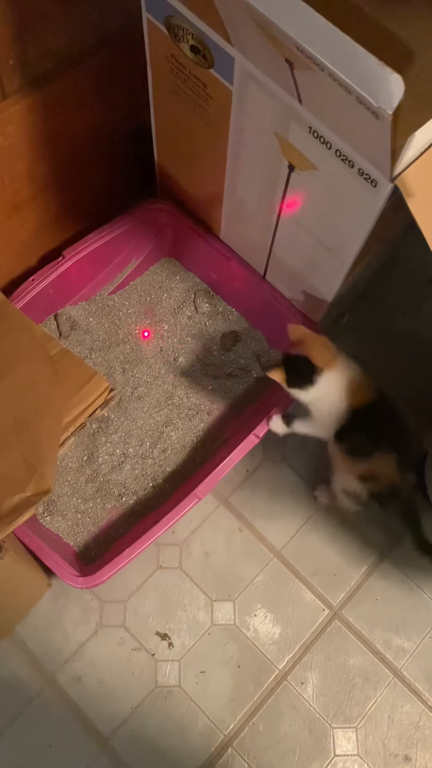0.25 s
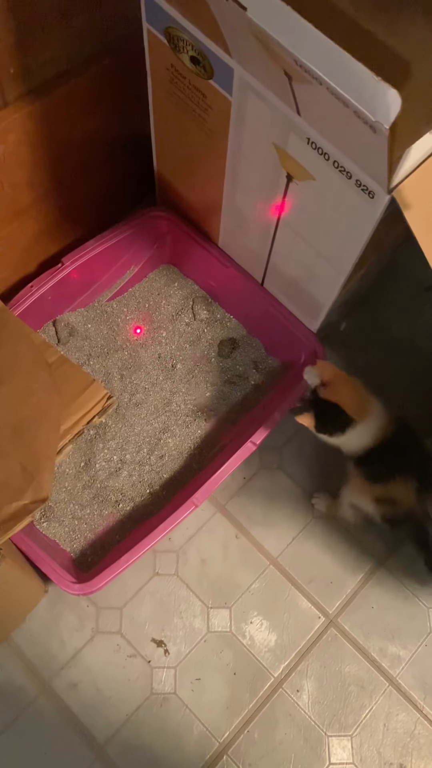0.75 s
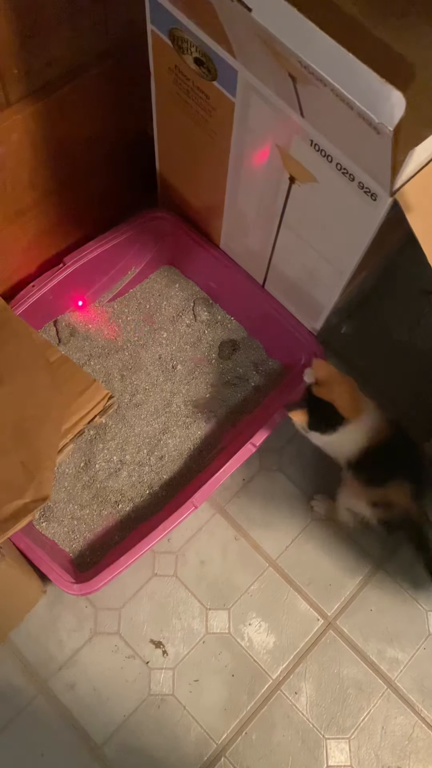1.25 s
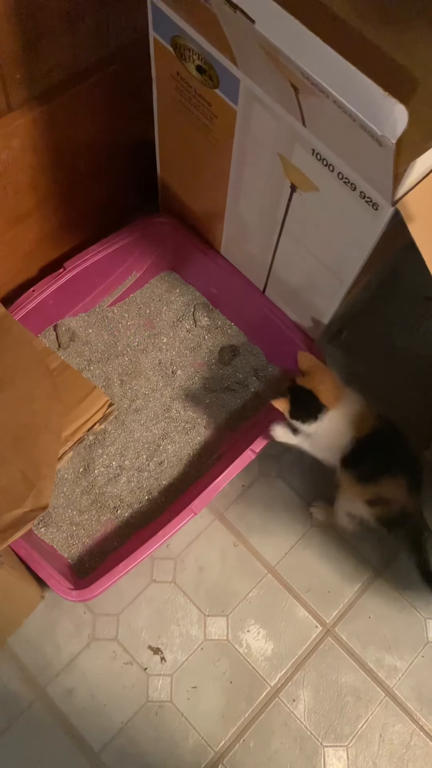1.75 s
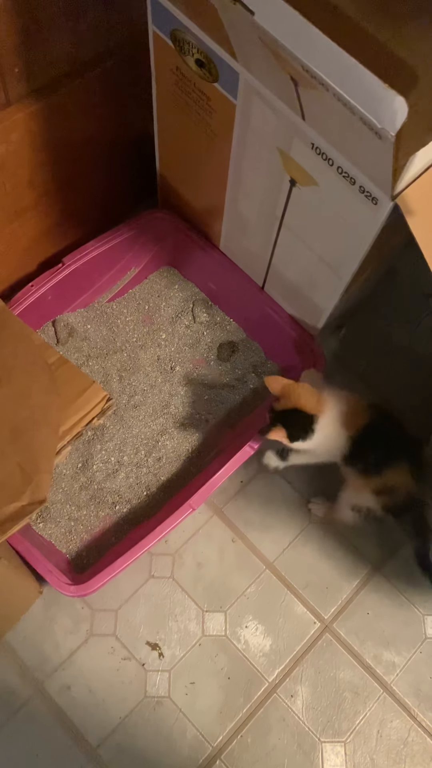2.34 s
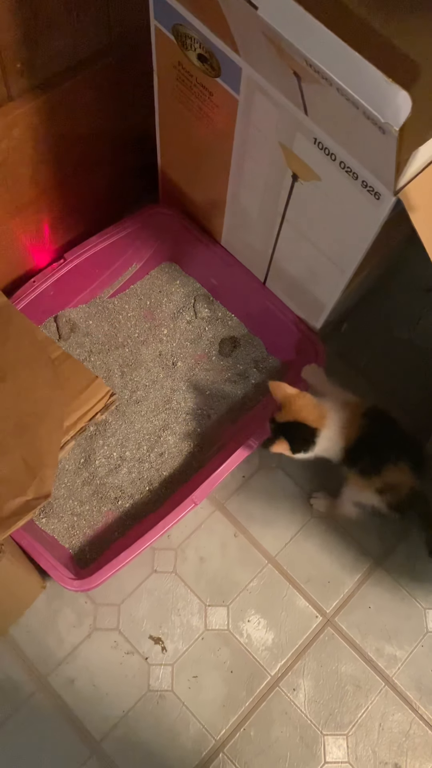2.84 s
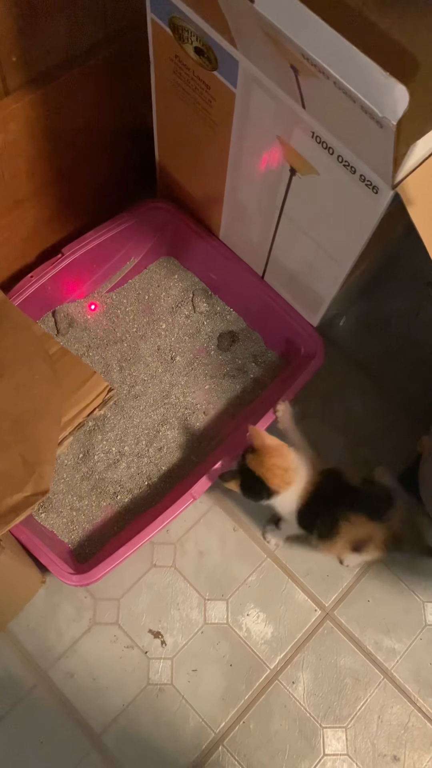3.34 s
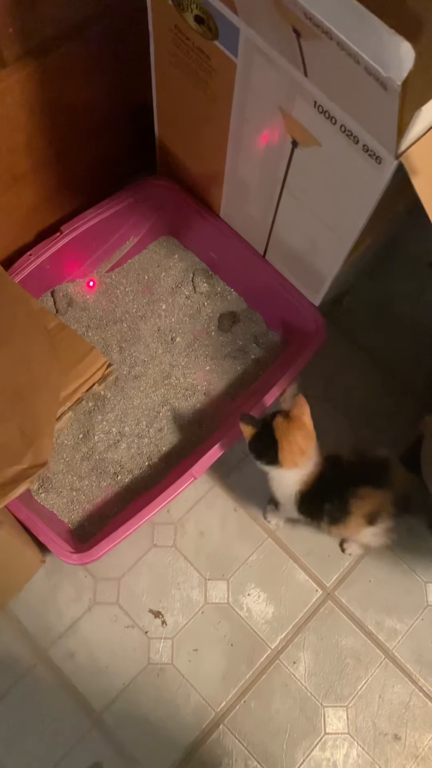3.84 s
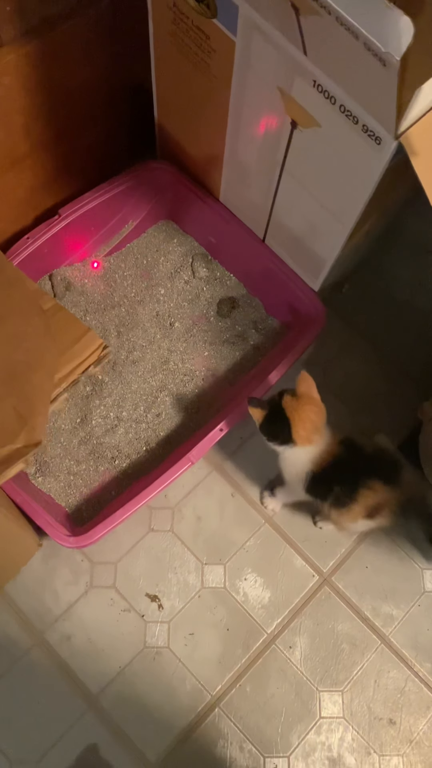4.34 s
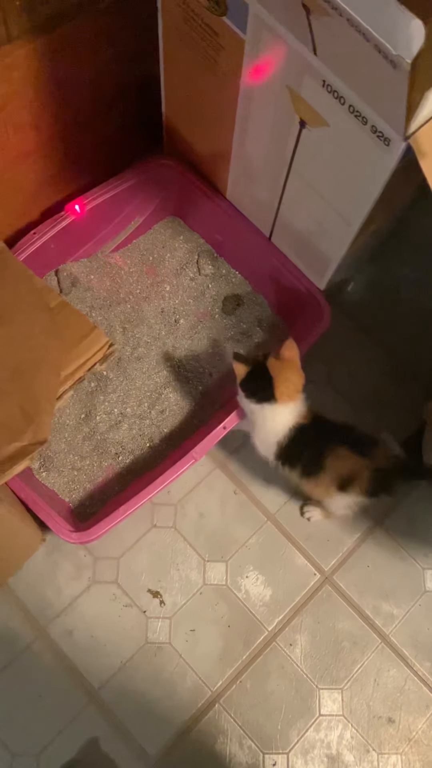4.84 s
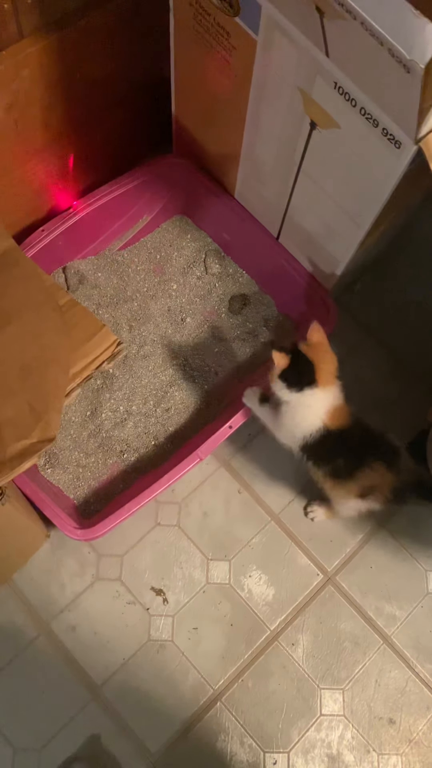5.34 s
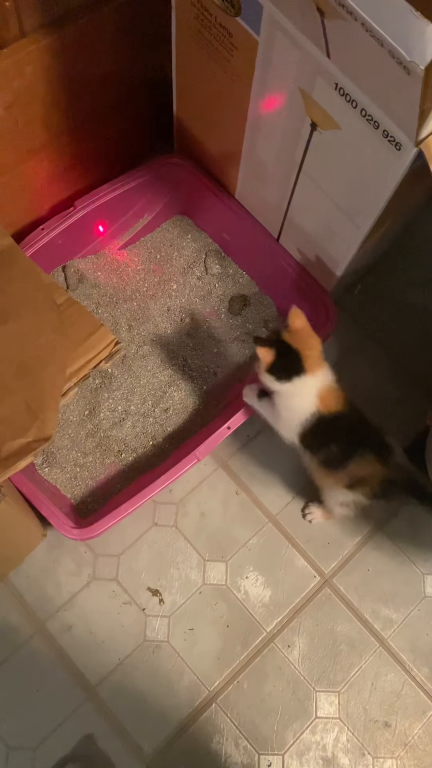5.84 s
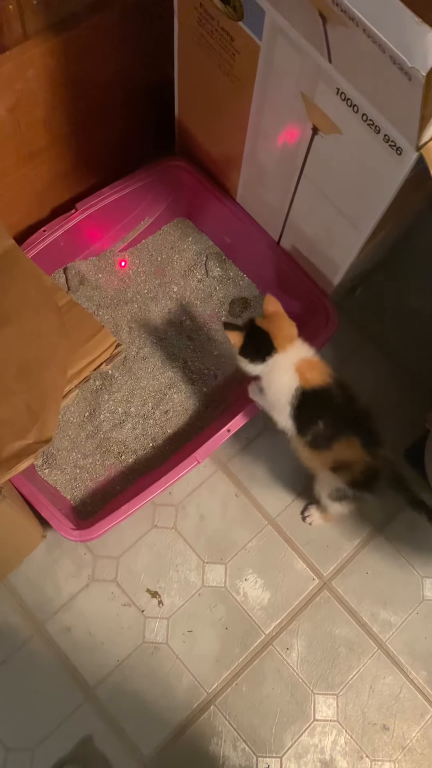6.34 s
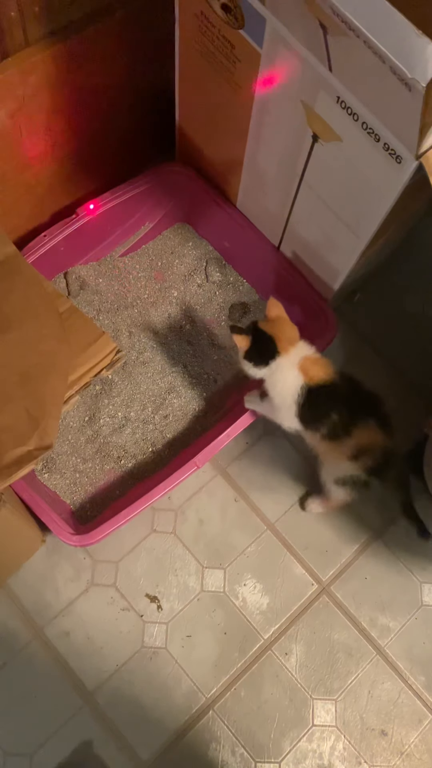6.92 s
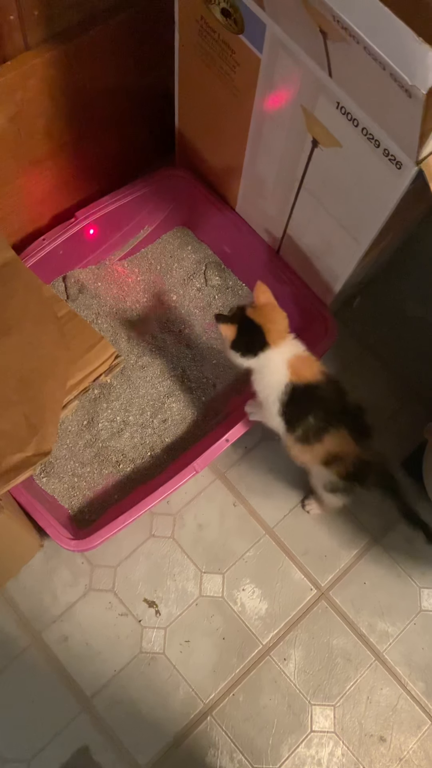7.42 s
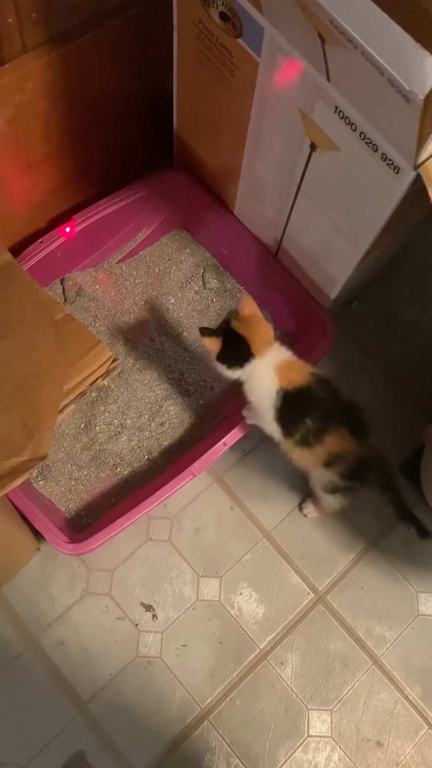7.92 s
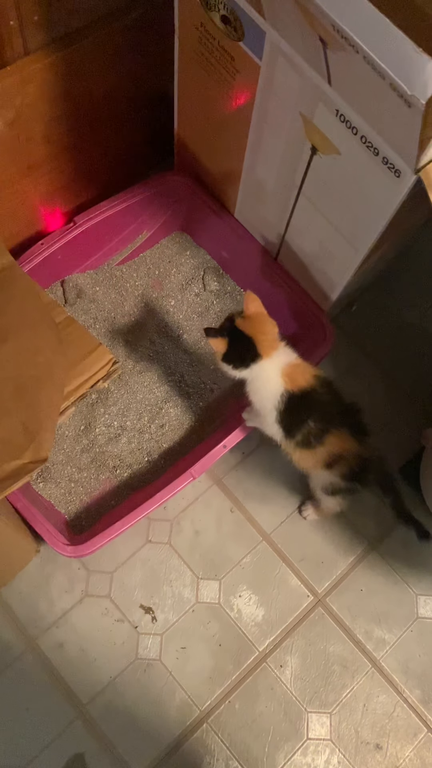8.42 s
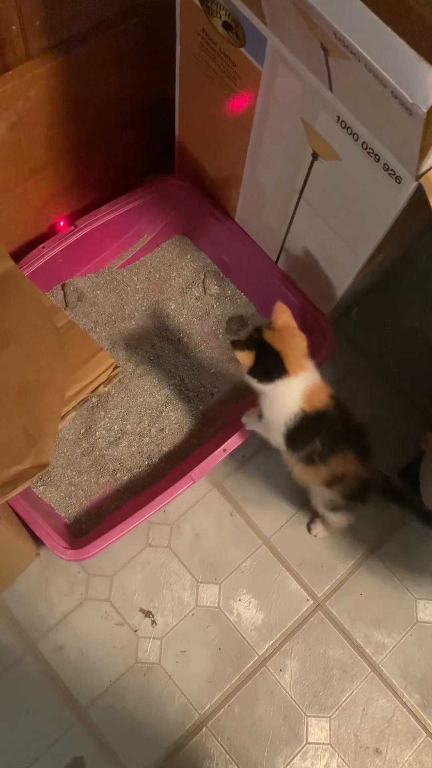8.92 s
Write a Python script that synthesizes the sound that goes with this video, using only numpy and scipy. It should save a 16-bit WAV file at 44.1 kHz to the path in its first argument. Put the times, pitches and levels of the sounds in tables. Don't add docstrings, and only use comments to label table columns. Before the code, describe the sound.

Close phone pickup of a kitten beside a litter tray on a hard floor. Light claw ticks and soft fur brushing come between short pounces that knock the plastic rim, thump softly and scatter clay grains. The heaviest landing comes about halfway, then activity nearly stops. Short room reflections follow each hit, while a low appliance drone with faint whine and a distant, dim clock tick continues underneath.

```python
import sys
import numpy as np
from scipy import signal
from scipy.fft import rfft, irfft, next_fast_len
from scipy.io import wavfile
from scipy.ndimage import uniform_filter1d

SR = 44100
rng = np.random.default_rng(int(sys.argv[2]) if len(sys.argv) > 2 else 0)


def master(y):
    cut = np.clip(np.atleast_2d(y).T, -1, 1)
    pcm = np.round(cut * 32767)
    wavfile.write(sys.argv[1], SR, pcm.astype(np.int16))


def makeup_ratio(level_db):
    decades = np.asarray(level_db, float) / 20
    return 10 ** decades


N = 403956
M = next_fast_len(N)
T = np.arange(N) / SR
HZ = np.maximum(np.arange(M // 2 + 1) * SR / M, 1)

# f/Hz, rms level/dB, wobble/dB
HUM = [(58.7, -52, .5), (67.8, -63, 1.0), (120, -57, .6), (155.3, -72, 1.1), (176.1, -76, 1.1),
       (360, -70, 1.5), (761, -81, 2.1)]
# f/Hz, spectral level/dB
AIR = [(22, -29), (36, -14.5), (52, -0.5), (75, -8), (98, -1), (135, -12), (220, -14.5), (335, -9),
       (420, -14.5), (750, -16.5), (1600, -30.5), (2600, -34), (3600, -40.5), (5000, -41.5)]
# f/Hz, spectral level/dB
HISS = [(4500, -6), (6000, 3), (7500, 2), (8500, 1.5), (10000, 0), (12200, -2), (13500, -10), (14500, -28),
        (16500, -34)]
# peak t/s, rise/s, hold/s, level/dB, lower band re level/dB
BRUSH = [(0.198, .06, 0.039, -75.5, -8), (.266, .01, .004, -75, 8), (.356, .06, .004, -87, 1),
         (0.774, .02, .004, -83, 8), (0.95, .17, .004, -85, 8), (1.623, 0.045, 0.0036, -87, 14),
         (1.686, 0.051, 0.0036, -66.5, 6.5), (1.982, .01, .08, -95, 8), (2.123, .17, .004, -80.5, 6),
         (2.136, .03, .004, -78, 4), (2.627, .004, .004, -78, -3), (2.658, 0.089, .004, -87.5, 23),
         (3.078, 0.058, .004, -75, -2), (3.108, 0.063, 0.019, -71, -12), (3.218, 0.034, .004, -72, 0.5),
         (3.287, 0.037, .004, -74.5, -5), (4.072, .035, 0.086, -77, 4.5), (4.549, 0.0044, .004, -78, 17),
         (4.632, 0.045, .016, -61.5, -13), (4.728, 0.013, .004, -77, -5), (4.92, .045, .004, -84, -4)]
# f/Hz, level/dB
BRUSH_TOP = [(5000, -15), (6500, -7.5), (8000, -6), (10500, -10.5), (12500, -11), (14000, -16),
             (15100, -13), (16500, -27)]
BRUSH_LOW = [(900, -36), (1800, -2), (2350, 2.5), (2780, 10), (3250, 4), (4500, 1), (6000, -2.5),
             (7500, -26)]
# f/Hz, level/dB
ROOM_COLOUR = [(100, -21.5), (270, -10), (450, 1), (1500, -5.5), (2400, -8), (5000, -5.5), (12000, -10.5)]
# t/s, peak level/dB, ring f/Hz, grit re peak/dB, top band re peak/dB
CLAWS = [(0.268, -55, 4600, -8, -13), (0.5053, -34, 2700, -28, -51), (0.5145, -30, 2260, -10.5, -38),
         (0.7784, -57, 2830, 1, -16), (1.2346, -43, 2840, -16, -24), (1.2506, -40.5, 3040, -7, -19.5),
         (1.3484, -40, 2420, -18, -23), (1.3542, -43.5, 3750, 3, -17), (1.4172, -54.5, 2950, -3, -11.5),
         (1.638, -59, 3700, 5.5, -31), (1.8846, -41.5, 3070, -6, -26), (2.142, -54, 3830, -2.5, -10),
         (2.2852, -54, 2300, 3, -8), (2.5995, -40.5, 2550, -4, -20), (2.612, -40, 2220, 1, -19),
         (2.842, -56, 1820, -7, -40), (3.2465, -45, 2550, -7, -36), (3.7406, -41, 3450, -4, -16.5),
         (4.5553, -44.5, 2200, -5, -40), (4.566, -46, 2100, -23, -39), (4.577, -46, 1980, -16, -40),
         (4.648, -50.5, 2300, -21, -12), (4.661, -46, 1900, -22, -24), (5.3403, -49, 2820, -2, -19)]
# t/s, peak level/dB, top band re peak/dB
GRAZES = [(0.772, -57, -23), (1.6766, -54, -10), (1.687, -51, -11), (1.698, -59, -8), (2.1054, -70, -5),
          (2.12, -57.5, -12), (2.663, -57, -26), (3.05, -61, -15), (3.437, -55.5, -35), (3.841, -60, -24),
          (4.059, -59, -25), (4.076, -56.5, -26), (4.1108, -54, -27), (4.1718, -52, -19), (4.614, -59, -21),
          (4.729, -66, -5)]
# t/s, peak level/dB, ring f/Hz, t60/s
KNOCKS = [(0.506, -40, 1320, 0.011), (0.5088, -40.5, 530, 0.0093), (0.5137, -41, 1110, 0.016),
          (.517, -37, 630, 0.0081), (1.235, -51, 1290, 0.037), (1.238, -48.5, 415, 0.019),
          (1.682, -53, 1210, 0.018), (1.697, -55, 1100, 0.011), (1.701, -49, 690, 0.013),
          (1.6988, -42, 420, 0.011), (2.611, -43, 1286, 0.036), (2.613, -41.5, 743, 0.016),
          (2.6157, -44, 450, 0.019), (2.618, -44, 1110, 0.014), (2.839, -58, 1290, 0.019),
          (4.5555, -48, 2095, 0.027), (4.566, -46, 2090, 0.027), (4.557, -44.5, 1100, 0.014),
          (4.560, -47.5, 520, 0.014), (4.579, -50, 1190, 0.018), (4.598, -45, 760, 0.014),
          (4.599, -54, 1240, 0.016), (4.611, -39.5, 500, 0.013), (4.617, -40.5, 350, 0.04),
          (4.629, -43, 352, .03), (4.663, -42.5, 1280, 0.011), (4.637, -49, 1790, 0.023),
          (4.664, -49.5, 805, 0.016), (5.607, -61, 520, 0.01)]
# t/s, peak level/dB, settled f/Hz, t60/s, swell/s
THUDS = [(.509, -53, 332, 0.025, 0.0014), (.517, -42.5, 220, 0.066, 0.0016),
         (1.256, -47, 216, 0.044, 0.0029), (1.719, -45, 108.6, 0.18, 0.018), (1.2393, -38, 195, .035, .004),
         (1.7036, -36, 180, .075, .003), (2.6132, -39, 215, .09, .002), (2.626, -50, 150, .08, .005),
         (4.6149, -26, 172, .03, .0045), (3.187, -49, 327, 0.085, 0.0027), (4.556, -41, 290, 0.037, 0.0045),
         (4.628, -53, 191, 0.11, 0.0043), (4.639, -35.5, 144, 0.068, 0.0021),
         (4.656, -39.5, 92, 0.081, 0.0078), (7.328, -49.5, 311, 0.11, 0.0073),
         (7.68, -49, 178.5, 0.1, 0.014)]
# peak t/s, rise/s, hold/s, level/dB
LITTER = [
    (0.518, .004, 0.0018, -64),
    (0.533, .01, 0.036, -75),
    (1.69, 0.078, 0.0017, -69),
    (2.621, .004, 0.0036, -68),
    (2.64, .01, .03, -70),
    (2.69, .09, .004, -68),
    (4.566, .004, 0.023, -66),
    (4.603, .02, .007, -65),
    (4.624, .03, 0.039, -63.5),
]
# f/Hz, level/dB
CLOCK = [(900, -10), (1600, -8), (2100, -3), (2600, -16), (4000, -13), (5500, -31), (7000, -45),
         (9000, -68)]
CLOCK_STEP_DB = [3.5, -1, 0.5, 0, 1, -2, 4, -1.5, 2.5]
# f/Hz, left
NEAR_LEAD = [(0, 0), (690, .6), (1380, -.4), (2840, 1.6), (3790, 1.0)]
CLAW_LEAD = [(0, 0), (2800, 1.3)]
FAR_LEAD = [(0, 0), (430, .6), (580, 2.2), (700, 1.6), (1030, 2.4), (1890, .6), (3100, 2.6), (4050, .8)]
TREBLE_LEAD = [(5300, .9), (6900, 3.0), (8100, 3.4), (9900, 6.1), (11400, 6.6), (12800, 9.1), (14200, 9.7),
               (15900, 11.9)]
# f/Hz, likeness/0-1
FAR_LIKE = [(40, 0.59), (120, 0.88), (200, 1), (400, 0.69), (800, 0.24), (2500, 0.39), (4200, 0.67),
            (5500, 0.36), (6800, 0.93), (16000, 0.24)]
# f/Hz, left re right/dB
FAR_BALANCE = [(60, 3), (110, -1), (200, 4), (380, 1), (700, 5), (1290, 4.0), (2380, 0), (4400, 1),
               (8120, 1.5), (15000, 1)]


def over_hz(table):
    f, value = np.transpose(table)
    return np.interp(np.log(HZ), np.log(f), value)


def heard(spectrum):
    return irfft(spectrum, M)[:N]


def noise():
    return rfft(rng.standard_normal(M))


def unit(x):
    return x / np.sqrt(np.mean(x ** 2))


def coloured(table):
    return unit(heard(noise() * makeup_ratio(over_hz(table))))


def walk(rate_hz):
    k = int(SR / rate_hz)
    levels = rng.standard_normal(4096)
    held = levels[np.arange(N) // k]
    return unit(uniform_filter1d(uniform_filter1d(held, k), k))


def band(x, lo_hz, hi_hz, order=2):
    sections = signal.butter(order, [lo_hz, hi_hz], "band", fs=SR, output="sos")
    y = signal.sosfilt(sections, x)
    return y / np.max(np.abs(y))


def add(out, s, sound):
    i = int(s * SR)
    out[i:i + len(sound)] += sound[:N - i]


def hum():
    out = np.zeros(N)
    for hz, db, wobble_db in HUM:
        tone = np.sin(2 * np.pi * (hz * T + rng.random()))
        out += np.sqrt(2) * makeup_ratio(db + wobble_db * walk(2.3)) * tone
    return out


def air():
    spectrum = noise() * makeup_ratio(over_hz(AIR)) / (1 + (HZ / 5250) ** 8)
    place = np.clip(np.log(HZ / 60) / np.log(5), 0, 3)
    rumble = np.zeros(N)
    for register in range(4):
        share = np.clip(1 - np.abs(place - register), 0, 1)
        rumble += heard(spectrum * share) * makeup_ratio(.9 * walk(3) + .7 * walk(14))
    whine_hz, whine_width_hz = 4168, 143
    whine = heard(noise() / (1 + ((HZ - whine_hz) / whine_width_hz) ** 4))
    hiss = makeup_ratio(-93.3) * coloured(HISS)
    return makeup_ratio(-55.5) * unit(rumble) + makeup_ratio(-77 + 0.61 * walk(25)) * unit(whine) + hiss


def stroke(s, rise, hold, db, fall_db_per_s):
    climb_db = 30 * np.clip(s - T, 0, 1) / rise
    fall_db = fall_db_per_s * np.clip(T - s - hold, 0, 1)
    return makeup_ratio(db - climb_db - fall_db)


def brush():
    top, low = np.zeros(N), np.zeros(N)
    for s, rise, hold, db, low_db in BRUSH:
        top += stroke(s, rise, hold, db, 420)
        low += stroke(s, rise, hold, db + low_db, 420)
    patches = makeup_ratio(3.4 * walk(220) + 0.52 * walk(40))
    return patches * (top * coloured(BRUSH_TOP) + low * coloured(BRUSH_LOW))


def room():
    t60_s = 0.21
    t = T[:SR // 2]
    onset = np.clip((t - .0015) / 0.0039, 0, 1)
    early = makeup_ratio(4.5) * np.exp(-t / 0.0066)
    tail = rng.standard_normal(len(t)) * onset * (np.exp(-np.log(1000) * t / t60_s) + early)
    return rfft(tail / np.sqrt(np.sum(tail ** 2)), M) * makeup_ratio(over_hz(ROOM_COLOUR))


def claws():
    out, t = np.zeros(N), T[:SR // 25]
    graze_hz, graze_grit_db = 2660, -15
    ring_s, scratch_s = 0.0034, 0.0048
    ticks = CLAWS + [(s, db, graze_hz, graze_grit_db, top_db) for s, db, top_db in GRAZES]
    attack = 1 - np.exp(-t / 0.00048)
    snap = np.exp(-((t - .0006) / .00005) ** 2)
    for s, db, hz, grit_db, top_db in ticks:
        ring_noise, grit_noise, fizz_noise = rng.standard_normal((3, len(t))) * attack
        ring = band(ring_noise * np.exp(-t / ring_s) + 2.5 * snap, .86 * hz, 1.16 * hz)
        scratch = np.exp(-t / scratch_s)
        grit = makeup_ratio(grit_db) * band(grit_noise * scratch, 3420, 7100)
        fizz = makeup_ratio(top_db + 11.5) * band(fizz_noise * scratch, 5400, 14000)
        add(out, s, makeup_ratio(db) * (0.8 * ring + grit + fizz))
    return out


def plate(hz, t60, swell, glide, glide_s):
    t = T[:SR // 4]
    phase = 2 * np.pi * hz * (t + glide * glide_s * (1 - np.exp(-t / glide_s)))
    fade = np.exp(-np.log(1000) * t / t60)
    low_mode = .15 * fade ** .6 * np.sin(.7 * phase)
    ring = (1 - np.exp(-t / swell)) ** 2 * (fade * np.sin(phase) + low_mode)
    return ring / np.max(np.abs(ring))


def knocks():
    out = np.zeros(N)
    for s, db, hz, t60 in KNOCKS:
        add(out, s, makeup_ratio(db) * plate(hz, t60, .0008, glide=.3, glide_s=.001))
    rattle = unit(band(rng.standard_normal(N), 150, 900, order=1))
    return out * (1 + .45 * rattle)


def thuds():
    out = np.zeros(N)
    for s, db, hz, t60, swell in THUDS:
        add(out, s, makeup_ratio(db) * plate(hz, t60, swell, glide=.8, glide_s=.004))
    return out


def litter():
    grains_per_s = 2100
    level = sum(stroke(*shake, 802) for shake in LITTER)
    landing, size, sign = rng.random((3, N))
    grains = (landing < grains_per_s / SR) * makeup_ratio(-3.2 * np.log(size)) * np.sign(sign - .5)
    return makeup_ratio(3) * level * unit(band(grains, 600, 3200))


def clock():
    first_s, level_db = 0.881, -68
    since = (T - first_s) % 1
    step = np.clip(((T - first_s) // 1).astype(int), 0, len(CLOCK_STEP_DB) - 1)
    shape = (1 - np.exp(-since / 0.01)) * np.exp(-(since / 0.091) ** 2) * (T > first_s)
    return shape * makeup_ratio(level_db + np.array(CLOCK_STEP_DB)[step])


def ports(same, other, lead, tilt_db=0):
    phase = np.interp(HZ, *np.transpose(lead + TREBLE_LEAD))
    turn = makeup_ratio(tilt_db / 2) * np.exp(.5j * phase)
    return np.array([heard((same + other) * turn), heard((same - other) / turn)])


def scene():
    ticks = rfft(claws(), M)
    body = rfft(brush() + knocks() + thuds() + litter(), M)
    like = over_hz(FAR_LIKE)
    same, other = np.sqrt((1 + like) / 2), np.sqrt((1 - like) / 2)
    near_same = body + (ticks + body) * same * room()
    near_other = (ticks + body) * other * room()
    near = ports(near_same, near_other, NEAR_LEAD)
    steps = clock()
    house = [weight * rfft(air() + steps * coloured(CLOCK), M) for weight in (same, other)]
    far = ports(*house, FAR_LEAD, over_hz(FAR_BALANCE))
    return ports(ticks, 0, CLAW_LEAD) + near + far + hum()


def top_cut(x):
    return signal.sosfilt(signal.butter(12, 16400, fs=SR, output="sos"), x)


def record(dry):
    low_pass = signal.ellip(8, .2, 60, 15900, fs=SR, output="sos")
    mix = signal.sosfilt(low_pass, dry)
    return top_cut(mix)


dry = scene()
out = record(dry)
master(out)
```